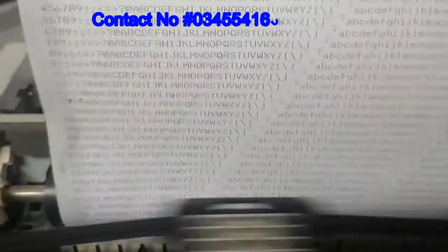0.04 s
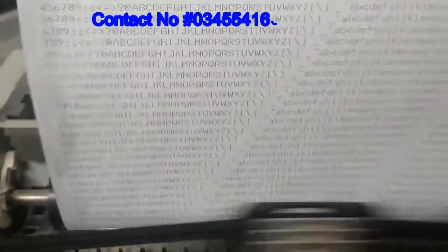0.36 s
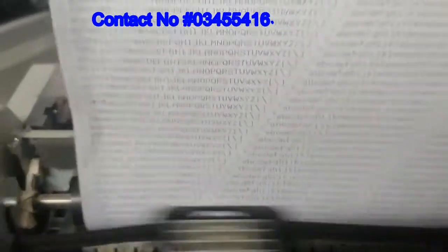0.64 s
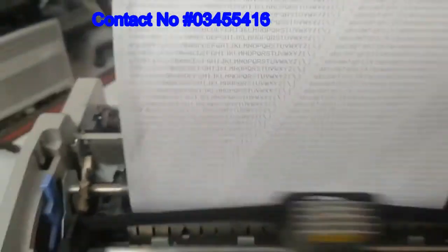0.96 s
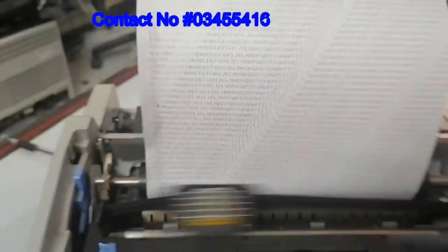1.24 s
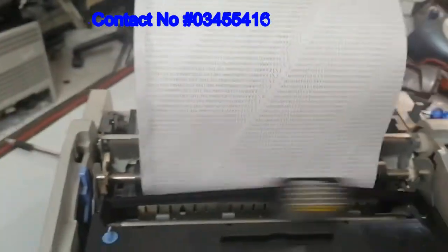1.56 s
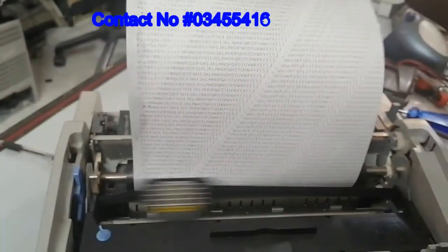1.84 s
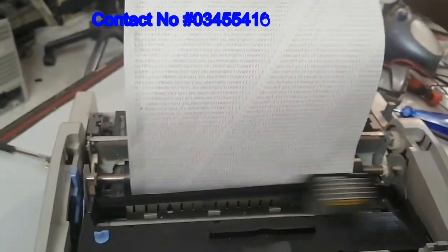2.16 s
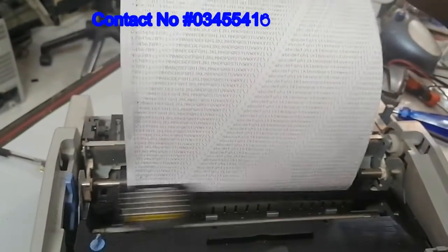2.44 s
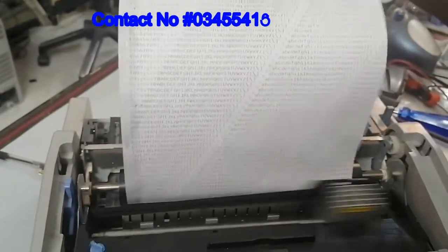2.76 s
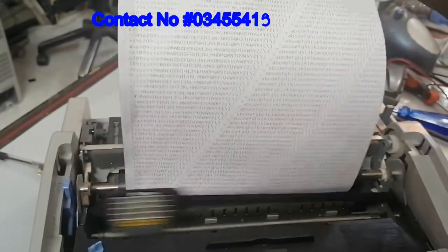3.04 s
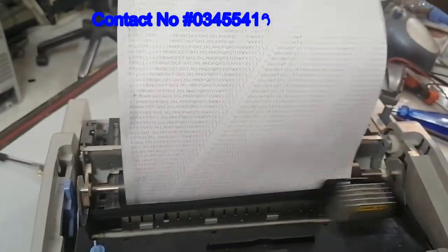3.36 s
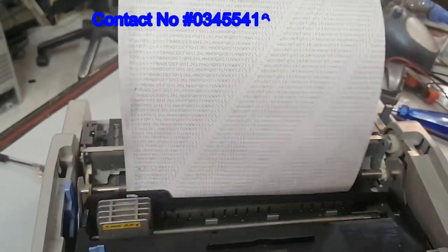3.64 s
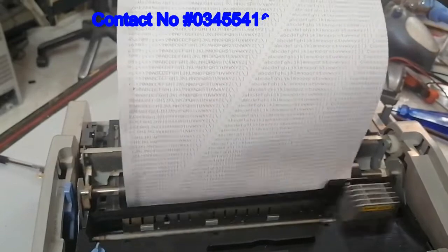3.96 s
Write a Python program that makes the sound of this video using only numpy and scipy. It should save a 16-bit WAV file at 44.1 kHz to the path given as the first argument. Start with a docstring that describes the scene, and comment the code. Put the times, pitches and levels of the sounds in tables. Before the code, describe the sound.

A dot matrix printer runs close by from the start to the end at 4 seconds, printing thirteen lines, one about every 0.3 seconds. Each is a harsh, bright rasp with a fluttering high whine and faint motor hum. In the brief gaps the paper steps on and the carriage knocks softly. The small room reverberates over steady background noise, and a faint deep rumble swells around 3 seconds.

```python
"""On a workbench in a small room, a dot matrix printer prints thirteen lines, right and left in turn.
Its pins hammer paper and platen, and the impacts excite short resonances: a harsh rasp. Their periodic
part is a whine at the column rate, which rises as the carriage gathers speed. The motor hums along.
Between lines the paper steps on while the carriage brakes and turns with a knock.
The room reverberates over a steady background noise, and a deep rumble swells in the second half."""
import sys
import numpy as np
from scipy import signal
from scipy.fft import rfft, irfft
from scipy.io import wavfile

SR = 44100
rng = np.random.default_rng(int(sys.argv[2]) if len(sys.argv) > 2 else 0)


def dump(signal):
    """Clip the signal to [-1, 1] and save it as 16-bit WAV at the path in sys.argv[1]."""
    limited = np.clip(np.atleast_2d(signal).T, -1, 1)
    pcm = np.round(limited * 32767).astype(np.int16)
    wavfile.write(sys.argv[1], SR, pcm)


N = 176400
T = np.arange(N) / SR
LINE_S, COLUMN_HZ = 0.2307, 3123.0   # length of a line; column rate at full speed
EAR_LAG_S, LOW_PAN_DB = 0.00082, 3   # delay at the right ear; leftward lean of the low sounds


def from_db(db):
    """Amplitude ratio of a level in decibels."""
    return 10 ** (np.asarray(db) / 20)


def unit_rms(x):
    """Normalisation to unit mean power."""
    return x / np.sqrt(np.mean(x ** 2) + 1e-20)


def panned(db):
    """Interaural level difference as two gains; positive favours the left."""
    return from_db(np.array([[.5], [-.5]]) * db)


def drift(rate_hz):
    """Low-passed Gaussian noise: a random modulator of unit rms."""
    pole = np.exp(-2 * np.pi * rate_hz / SR)
    return unit_rms(signal.lfilter([1], [1, -2 * pole, pole * pole], rng.standard_normal(N + SR))[SR:])


def tone(cycles):
    """A sinusoid of unit rms with slight random phase modulation."""
    return np.sqrt(2) * np.sin(2 * np.pi * cycles + 0.44 * drift(23))


def coloured(x, points):
    """Zero-phase filtering by a curve of (frequency_hz, gain_db) points."""
    hz, db = np.transpose(points)
    bins_hz = np.maximum(np.fft.rfftfreq(2 * N, 1 / SR), 1)
    gain = from_db(np.interp(np.log(bins_hz), np.log(hz), db))
    return irfft(rfft(x, 2 * N) * gain)[..., :N]


def below(x, hz):
    """Zero-phase low-pass filtering."""
    return signal.sosfiltfilt(signal.butter(4, hz, fs=SR, output="sos"), x)


def ringing(nominal_t60_s):
    """Dense damped modes: a stereo impulse response of unit energy and even spectrum."""
    t = np.arange(SR // 2) / SR
    decay = from_db(-60 * t / nominal_t60_s)
    spectrum = rfft(rng.standard_normal((2, len(t))) * decay)
    response = irfft(spectrum / np.abs(spectrum)) * np.sqrt(decay)
    return response / np.sqrt(np.sum(response ** 2, axis=1, keepdims=True))


def through(x, response):
    """Convolution with an impulse response."""
    return signal.fftconvolve(np.atleast_2d(x), response, axes=1)[:, :N]


def stereo_noise(colour):
    """Filtered noise, largely coherent between the ears and leaning left."""
    mid, side = coloured(rng.standard_normal((2, N)), colour)
    return unit_rms(mid + from_db(-11.5) * side * [[1], [-1]]) * panned(LOW_PAN_DB)


def shudder(events, rise_s=0.0055, fall_s=0.021):
    """Envelope of damped vibration: exponential rise and decay about each (peak_s, level_db)."""
    return sum(from_db(db) * np.exp(-np.maximum((s - T) / rise_s, (T - s) / fall_s)) for s, db in events)


# spectrum of the background: frequency_hz, gain_db
BACKGROUND_COLOUR = [(30, -23), (45, 4), (60, -13.5), (130, -7), (350, -5.5), (550, -17), (1200, -7.5),
                     (6300, -6), (8500, -11), (15000, -52)]

def background():
    """Stationary broadband noise, densest in the bass."""
    return from_db(-50) * stereo_noise(BACKGROUND_COLOUR)


# carriage turns, left and right end alternately: peak_s, level_db
TURNS = [(.008, -40), (0.32, -44.5), (0.631, -45.5), (.943, -46.5), (1.252, -45), (1.567, -46),
         (1.87, -45.5), (2.187, -43.5), (2.493, -42), (2.803, -43.5), (3.111, -43.5), (3.425, -43.5),
         (3.732, -43.5)]
# spectrum of the knock: frequency_hz, gain_db
KNOCK_COLOUR = [(60, -5), (160, 0.5), (270, -1.5), (360, 2), (470, -2.5), (620, 3.5), (900, -9),
                (1300, -0.5), (2200, -43), (6000, -28)]

def turns(frame_hz=361.7, frame_from_s=1.2):
    """Impact excitation: each turn knocks, and the later ones at the left end ring a frame mode."""
    left_turns = [(s, db) for s, db in TURNS[::2] if s > frame_from_s]
    frame = shudder(left_turns) * tone(frame_hz * T)
    return shudder(TURNS) * stereo_noise(KNOCK_COLOUR) + frame * panned(LOW_PAN_DB)


# printed lines, rightward first: start_s, platen_db, paper_db, pin_hiss_db, chirp_db
LINES = [(0.027, 1, -3, 0.5, -37), (0.338, -1, -2, 0, -43.5), (0.648, 0.5, -3.5, 0, -37),
         (0.96, -1.5, 0, -0.5, -43), (1.268, 0, -1.5, -0.5, -34.5), (1.580, -3, -0.5, 0, -43.5),
         (1.889, 0.5, 0.5, -0.5, -33.5), (2.203, -1, 0, -1.5, -51), (2.510, 2, 1, 0.5, -39.5),
         (2.820, -0.5, 0, -0.5, -48), (3.131, 3.5, 0, 1.5, -39), (3.441, -1.5, 0, -0.5, -42),
         (3.751, 2.5, 0, 0, -36)]

def carriage(speed_up_s=0.027, release_s=0.0054):
    """Speed integrates to distance. Gives line index, time into it, columns passed, firing envelope."""
    starts = np.array(LINES)[:, 0]
    line = np.maximum(np.searchsorted(starts, T, side="right") - 1, 0)
    age = T - starts[line]
    speed = 1 - 0.41 * np.clip(1 - age / speed_up_s, 0, 1) ** 1.5
    attack_s = np.where(line % 2, 0.0022, 0.0015)   # leftward lines begin more softly
    firing = np.clip(age / attack_s, 0, 1) ** .5 * np.exp(-np.maximum(age - LINE_S, 0) / release_s)
    return line, age, np.cumsum(speed) * COLUMN_HZ / SR, firing


# the nine columns of a character: mean_strength
COLUMN_INK = [0.82, 0.99, 0.69, 0.76, 0.2, 0.16, 1, 0.23, 0.065]

def pin_strikes(columns, jitter_s=0.00002, saturation=0.55):
    """An impulse train at columns and half columns carries the uneven part of the dot pattern."""
    half_columns = np.floor(2 * columns).astype(int)
    at = np.flatnonzero(np.diff(half_columns))
    step, width = half_columns[at], len(COLUMN_INK)
    scatter, weight, lateness = rng.standard_normal((3, N))
    ink = np.array(COLUMN_INK) - np.mean(COLUMN_INK)
    strength = np.where(step % 2, 0.4 * scatter[step], ink[step // 2 % width] + 0.62 * scatter[step])
    character_gain = from_db(-0.7 * weight[step // (2 * width)])
    at = np.clip(at + np.round(jitter_s * SR * lateness[step]).astype(int), 0, N - 1)
    clicks = np.zeros(N)
    clicks[at] = np.tanh(strength / saturation) * character_gain
    return unit_rms(clicks)


# spectra of the strikes at each ear: frequency_hz, gain_db
RASP_LEFT = [(250, -47.5), (800, -24), (1200, -17), (1550, -15.5), (1950, -21), (2500, -9.5), (3050, -10),
             (3800, -6.5), (4600, -11), (5500, -2.5), (6500, 1), (7100, -4), (7700, -14), (9300, -17.5),
             (12500, -21), (15000, -28)]
RASP_RIGHT = [(250, -40), (800, -27.5), (1200, -17.5), (1550, -13), (1950, -17.5), (2500, -14.5),
              (3050, -3.5), (3700, -7.5), (4300, -1), (5500, -9.5), (6500, 3), (7100, -2), (7700, -7.5),
              (9300, -8.5), (12500, -11), (15000, -18.5)]
# envelopes along a line, of all strikes and of the platen band: age_s, gain_db
STRIKE_SHAPE = [(0, -27.5), (.025, -28), (.06, -31), (.125, -33.5), (.19, -31.5), (.235, -31.5)]
PLATEN_SHAPE = [(0, -2.5), (.06, 5), (.09, 6), (.125, 0.5), (.235, -0.5)]

def rasp(line, age, columns, level, places=7, platen_top_hz=3150, paper_top_hz=5000):
    """Impacts excite modes of head, paper and platen; the response depends on the point struck."""
    clicks = pin_strikes(columns) * level
    travel = np.clip(age / LINE_S, 0, 1)
    place = np.where(line % 2, 1 - travel, travel) * (places - 1)
    crossfades = (np.cos(np.pi / 2 * np.clip(place - k, -1, 1)) for k in range(places))
    body = sum(through(clicks * fade, ringing(nominal_t60_s=0.02)) for fade in crossfades)
    left, right = body + from_db(-11) * clicks   # the bare clicks add a crack
    right = np.interp(T - EAR_LAG_S, T, right)
    strikes = np.array([coloured(left, RASP_LEFT), coloured(right, RASP_RIGHT)])
    strikes = unit_rms(strikes) * np.sqrt(np.mean(level ** 2)) * from_db(2)
    _, platen_db, paper_db, hiss_db, _ = np.array(LINES)[line].T
    low, low_and_mid = below(strikes, platen_top_hz), below(strikes, paper_top_hz)
    platen = low * from_db(platen_db + np.interp(age, *np.transpose(PLATEN_SHAPE)))
    paper = (low_and_mid - low) * from_db(paper_db)
    pin_hiss = (strikes - low_and_mid) * from_db(hiss_db)
    return platen + paper + pin_hiss


# partials of the character rate, relative to the strikes: harmonic, rightward_db, leftward_db
BUZZ_PARTIALS = [(7, -19.5, -25), (12, -21, -19), (16, -23.5, -31), (19, -30, -19)]

def buzz(line, age, columns, bright_harmonic=16):
    """Evenly spaced characters give harmonics of their rate, at unrelated phases in the two ears."""
    characters = columns / len(COLUMN_INK)
    place = np.where(line % 2, 1 - age / LINE_S, age / LINE_S)
    bloom_db = 14.5 * np.exp(-((place - 0.83) / 0.091) ** 2)   # near the right end of the track
    partials = np.zeros((2, N))
    for harmonic, rightward_db, leftward_db in BUZZ_PARTIALS:
        level_db = np.where(line % 2, leftward_db, rightward_db) + 2 * drift(30)
        level = from_db(level_db + bloom_db * (harmonic == bright_harmonic))
        partials += level * np.array([tone(harmonic * characters + phase) for phase in rng.random(2)])
    return partials * panned(3.5)


def whine_partial(cycles):
    """Random amplitude and phase modulation make a partial flutter and wander between the ears."""
    flutter = 1 + 0.4 * (drift(43) + 1j * drift(68))
    side = from_db(-3) * np.exp(1j * (np.pi / 2 + 1.3 * drift(14)))
    carrier = np.exp(1j * (2 * np.pi * cycles + 0.38 * drift(9.9)))
    return np.sqrt(2) * np.real(flutter * (1 + side * np.array([[1], [-1]])) * carrier)


# relative level curves of the fluttering whine along each line: time_s, fundamental_db, octave_db
WHINE_CURVES = [
    [(0.046, -49, -22.5), (0.122, -35.5, -36), (0.18, -48, -40), (0.236, -25, -40), (0.258, -39, -44)],
    [(0.358, -26, -30.5), (0.388, -30, -23), (0.44, -44, -46), (0.462, -34.5, -28), (0.57, -40, -38)],
    [(0.665, -41, -20), (0.725, -31, -44), (0.743, -28.5, -32.5), (0.837, -43, -34), (0.877, -42, -46)],
    [(0.98, -33.5, -28), (1.074, -33, -37), (1.126, -36, -26.5), (1.158, -31, -62), (1.192, -66, -24)],
    [(1.287, -53, -42), (1.31, -38, -32), (1.333, -31, -28), (1.349, -27.5, -42), (1.463, -43, -26.5),
     (1.499, -55, -44)],
    [(1.599, -33, -16), (1.622, -34, -31), (1.643, -26.5, -49), (1.675, -33, -50), (1.719, -42, -78),
     (1.749, -56, -29), (1.811, -35, -35)],
    [(1.912, -34, -17), (1.938, -39, -31), (1.96, -34.5, -36), (2.074, -39.5, -40), (2.098, -30.5, -30),
     (2.122, -68, -42)],
    [(2.221, -24, -22), (2.239, -34.5, -27), (2.265, -25, -50), (2.383, -47, -23), (2.433, -39, -66)],
    [(2.528, -39, -28), (2.66, -35, -37), (2.676, -33, -45), (2.72, -44, -24), (2.742, -60, -46)],
    [(2.841, -46, -25), (2.879, -25.5, -30), (2.965, -43, -42.5), (3.003, -41, -24), (3.052, -42, -64)],
    [(3.149, -54, -23.5), (3.275, -31, -36), (3.291, -45, -46), (3.335, -42, -26), (3.362, -65, -45)],
    [(3.46, -43.5, -26), (3.522, -27, -36), (3.584, -60, -42), (3.604, -53, -24.5), (3.672, -46, -49)],
    [(3.769, -59, -17), (3.785, -29, -25), (3.845, -49, -41), (3.873, -27, -27.5), (3.982, -72, -41)],
]
# octave of the opening chirp: rightward_db, leftward_db
CHIRP_OCTAVE = [-36.5, -41]
# upper partials, relative to the strikes: harmonic, level_db, pan_db
OVERTONES = [(3, -28, -7), (4, -33, -7)]

def whine(line, age, columns, firing, strike_level, settle_s=0.032):
    """Periodic impacts sound harmonics of the column rate, chirping upward as the carriage speeds up."""
    settled = firing * np.clip(age / settle_s, 0, 1) ** 2
    chirp = np.exp(-((age - 0.015) / 0.01) ** 2) * (1 + 0.75 * drift(520))
    fundamental_chirp = chirp * from_db(np.array(LINES)[line, -1])
    octave_chirp = chirp * from_db(np.array(CHIRP_OCTAVE)[line % 2])
    time_s, fundamental_db, octave_db = np.vstack(WHINE_CURVES).T
    fundamental = settled * from_db(np.interp(T, time_s, fundamental_db) - 3.8)
    octave = settled * from_db(np.interp(T, time_s, octave_db) - 4.5)
    sound = settled * steady_whine(columns)
    sound += (fundamental + fundamental_chirp) * whine_partial(columns)
    sound += (octave + octave_chirp) * whine_partial(2 * columns)
    for harmonic, db, pan_db in OVERTONES:
        sound += from_db(db) * strike_level * whine_partial(harmonic * columns) * panned(pan_db)
    return sound


def steady_whine(columns):
    """Interaural delay: the steady part of the pin whine at the column rate reaches the right ear late."""
    steady = tone(columns) * from_db(-38 + 2 * drift(30))
    return np.array([steady, np.interp(T - EAR_LAG_S, T, steady)])


# tones of the running carriage: pitch_hz, rightward_db, leftward_db
MOTOR_TONES = [(361.5, -63, -65.5), (705, -83, -58), (1042, -58.5, -57.5)]
# resonances that sing out briefly: peak_s, pitch_hz, level_db
RESONANCES = [(.556, 1040, -47.5), (1.175, 1040, -50), (.74, 1700, -48), (1.635, 1460, -42),
              (3.2, 2000, -46.5)]

def motor(line, firing, swell_s=0.021):
    """Machine vibration: wavering tones, balanced by direction of travel, and brief resonances."""
    tones = np.zeros(N)
    for hz, rightward_db, leftward_db in MOTOR_TONES:
        level = from_db(np.where(line % 2, leftward_db, rightward_db) + 3 * drift(50))
        tones += level * np.sin(2 * np.pi * hz * T + 1.27 * drift(11.4))
    swells = sum(from_db(db) * np.exp(-((T - s) / swell_s) ** 2) * tone(hz * T)
                 for s, hz, db in RESONANCES)
    return (tones + swells * (1 + .5 * drift(130))) * firing * panned(4.5)


# spectrum of the paper feed: frequency_hz, gain_db
FEED_COLOUR = [(80, -5), (200, 8.5), (450, 9), (800, 8), (1500, -1.5), (4000, -46)]

def paper_feed(age, peak_s=0.255, half_width_s=0.02, step_hz=464.5):
    """Motor steps roll the paper on after each line: noise amplitude-modulated at the step rate."""
    envelope = from_db(-53.5) * np.exp(-((age - peak_s) / half_width_s) ** 2)
    steps = 1 + 0.92 * np.sin(2 * np.pi * step_hz * age)
    return envelope * steps * stereo_noise(FEED_COLOUR)


# braking at the right end: peak_s, level_db
BRAKES = [(.282, -45.5), (.903, -51), (1.518, -57), (2.152, -52), (2.768, -53), (3.388, -53)]
# modes of the clunk: pitch_hz, gain_db
BRAKE_MODES = [(290, -4.5), (455, -4.5)]

def brakes():
    """The braking carriage excites two damped modes: a clunk."""
    modes = sum(from_db(db) * tone(hz * T) for hz, db in BRAKE_MODES)
    return shudder(BRAKES) * modes * panned(LOW_PAN_DB)


# spectrum of the reverberation: frequency_hz, gain_db
ROOM_COLOUR = [(1000, 3), (3100, 0.5), (4200, -5), (6500, 3), (8500, -1.5), (11500, -2)]

def room(direct, delay_s=0.0069):
    """Reverberation: diffuse reflections follow the direct sound after a short delay."""
    response = np.pad(ringing(nominal_t60_s=1), ((0, 0), (int(delay_s * SR), 0)))
    return from_db(-11) * coloured(through(direct, response), ROOM_COLOUR)


# swell of the deep rumble: time_s, level_db
RUMBLE_SWELL = [(1.3, -85), (2.2, -66.5), (2.9, -60), (4, -79)]
# its spectrum: frequency_hz, gain_db
RUMBLE_COLOUR = [(30, -34), (47, -7), (70, -12.5), (250, -36)]

def deep_rumble():
    """Low-frequency noise under a slow envelope."""
    return from_db(np.interp(T, *np.transpose(RUMBLE_SWELL))) * stereo_noise(RUMBLE_COLOUR)


def scene():
    """Superposition of the printer, its reverberation and the background."""
    line, age, columns, firing = carriage()
    strike_level = firing * from_db(np.interp(age, *np.transpose(STRIKE_SHAPE)))
    head = rasp(line, age, columns, strike_level) + strike_level * buzz(line, age, columns)
    head += whine(line, age, columns, firing, strike_level)
    printer = head + motor(line, firing) + turns() + brakes() + paper_feed(age)
    return printer + room(printer) + background() + deep_rumble()


def record(dry):
    """Band limiting: a steep elliptic low-pass at 15.8 kHz."""
    return signal.sosfilt(signal.ellip(12, .2, 80, 15800, fs=SR, output="sos"), dry)


dry = scene()
out = record(dry)
dump(out)
```